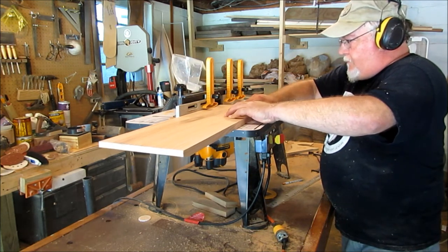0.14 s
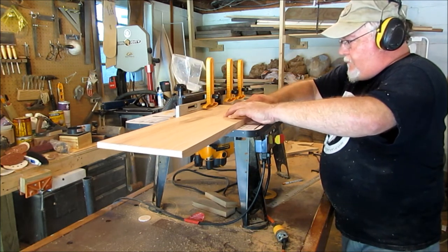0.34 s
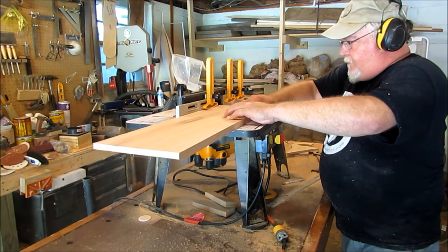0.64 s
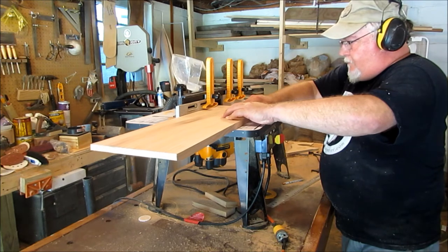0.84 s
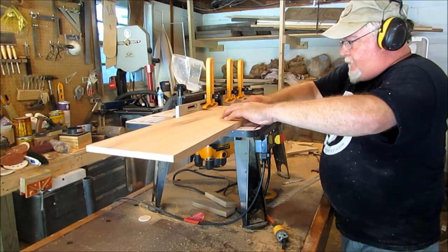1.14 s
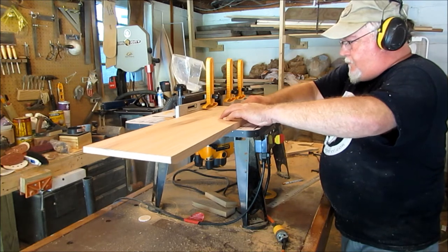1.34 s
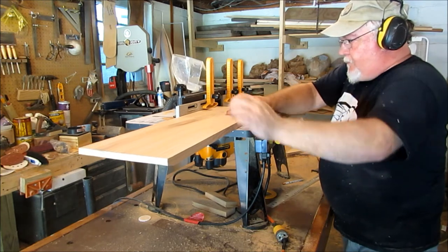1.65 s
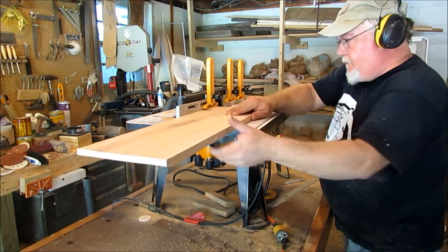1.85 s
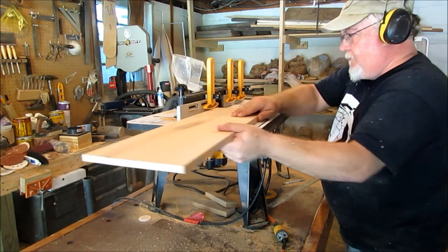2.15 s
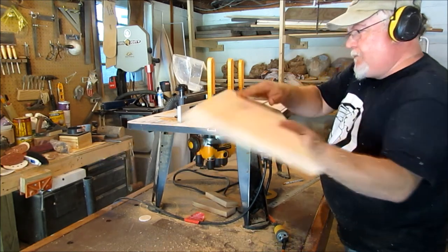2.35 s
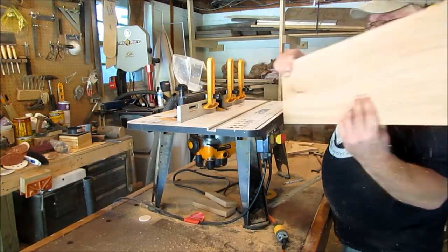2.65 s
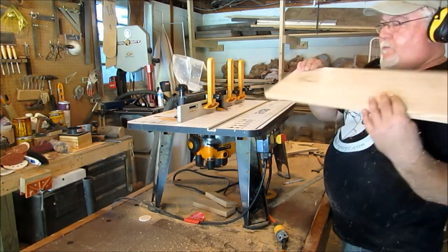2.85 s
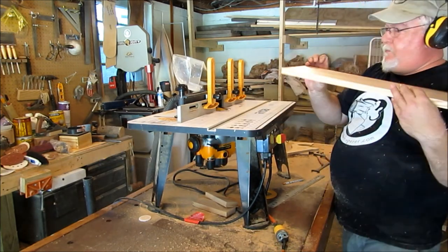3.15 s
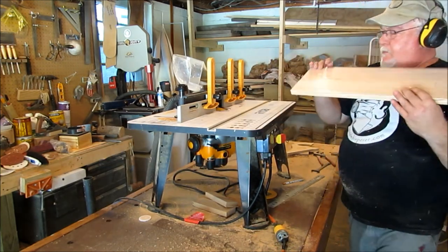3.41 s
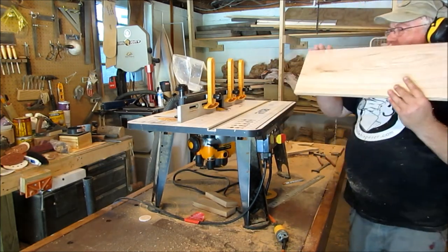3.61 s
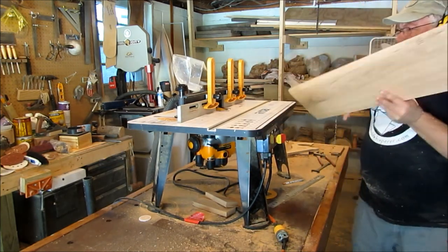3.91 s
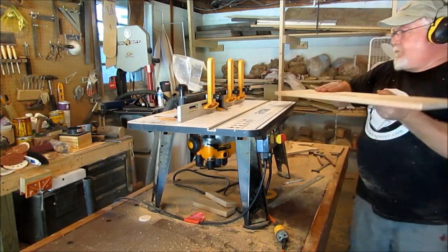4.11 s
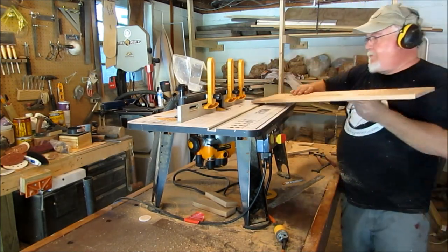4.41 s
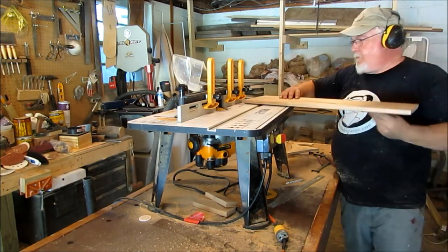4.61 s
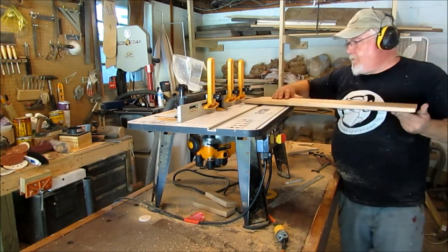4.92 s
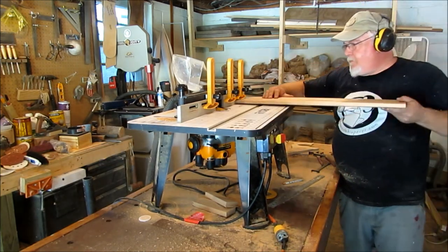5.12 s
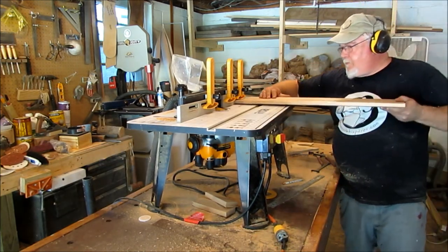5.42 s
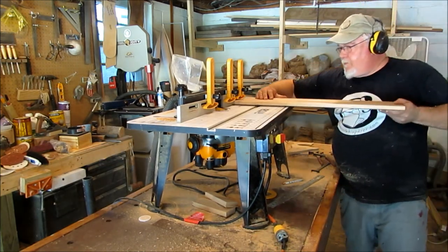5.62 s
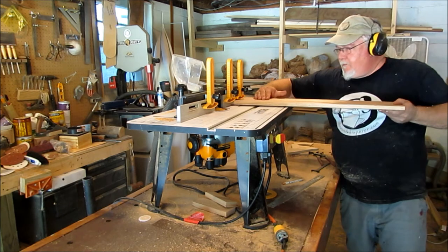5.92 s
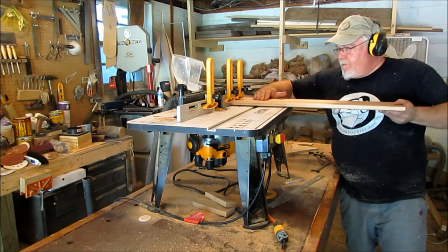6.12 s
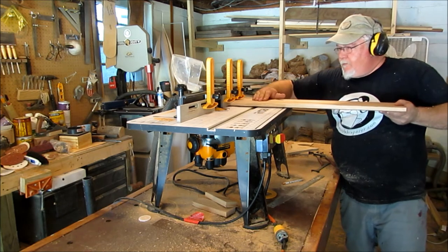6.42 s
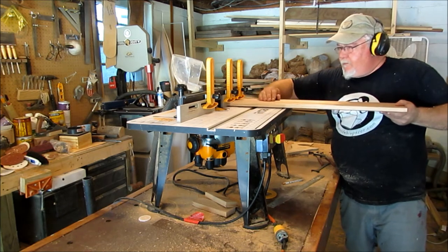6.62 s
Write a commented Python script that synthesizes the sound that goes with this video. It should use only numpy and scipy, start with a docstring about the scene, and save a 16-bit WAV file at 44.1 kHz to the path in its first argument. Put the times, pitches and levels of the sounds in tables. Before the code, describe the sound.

A table-mounted router snarls through the end of a wood cut, climbs to a steady high whine, then rattles faintly with soft wooden thuds.

```python
"""Table router in a workshop

A table router whines: its bit leaves a wooden panel and the shaft runs up to free speed, a loose part
starts to rattle once the panel is lifted, and later a panel edge touches the bit again.
Each whining tone is a sine at a multiple (order) of the shaft speed. Shaped noise makes the rush of
cooling air and a low rumble; the panel drums as a resonance and thuds as decaying sines, over mains hum."""
import sys
import numpy as np
from scipy import signal
from scipy.io import wavfile
from scipy.ndimage import uniform_filter1d

SR = 44100
rng = np.random.default_rng(int(sys.argv[2]) if len(sys.argv) > 2 else 0)


def materialize(psi):
    """Save the field psi as 16-bit PCM at rate SR to the path in sys.argv[1].

    A 1-D psi becomes a single channel; in a 2-D psi each row is a channel.
    """
    bounded = np.clip(np.atleast_2d(psi).T, -1, 1)
    quanta = np.round(bounded * 32767).astype(np.int16)
    wavfile.write(sys.argv[1], SR, quanta)


N = 298116
STEP = 256  # samples between values of the slow curves

# mean shaft speed, in turns per second: time_s, speed_hz
SHAFT_SPEED = [(0.0, 290.8), (0.21, 297.1), (0.34, 303.7), (0.68, 324.8), (0.85, 334.9), (0.98, 336.3),
               (1.45, 335.4), (3.88, 335.3), (4.25, 336.0), (4.33, 335.2), (6.72, 335.0), (6.76, 333.3)]
# onset of the loose part, added to the rattle levels: time_s, change_db
RATTLE_ONSET = [(2.17, -16), (2.23, 1.5), (5.1, -2), (6.76, 3)]


def whine(turns):
    """Harmonic synthesis: one sine per order; higher orders reach the two microphones less alike."""
    # interaural-style placing of strong orders, left-right level by panel position:
    # order, left_lead_rad, bare_db, covered_db, edge_db
    placing = [(1, -0.77, -3, 5, -9), (2, -0.25, -1, 0, 1), (3, -0.066, 0, 3, -1.5),
               (4, 0.74, -2.5, 1.5, 0), (8, .7, 7, -3.5, 5), (9, -0.62, -2.5, 3, 3), (13, 0.56, 8, 3, 8)]
    half_orders, high_orders = np.arange(1, 23) / 2, np.arange(12, 41)
    orders = np.concatenate([half_orders, high_orders])
    count = len(orders)
    t = step_times()
    amplitude = np.sqrt(2 * order_powers(t, orders))
    spread = np.clip(0.19 + 0.036 * orders, 0, 1.2)[:, None]
    lead = spread * (rng.standard_normal((count, 1)) + 1.16 * wander(0.13, count))
    pan_db = 0.8 + 3.0 * spread * wander(0.8, count)
    for order, lead_rad, *sides_db in placing:
        here = orders == order
        lead[here] = lead_rad + 0.12 * lead[here]
        pan_db[here] = by_panel(t, *sides_db) + 0.3 * pan_db[here]
    ears = np.array([gain_of(sign * pan_db) * np.exp(1j * sign * lead) for sign in (0.5, -0.5)])
    # the amplitude holds for the mean of both microphones, with a bound where they nearly cancel
    ears *= amplitude / np.maximum(abs(ears.mean(0)), 0.6)
    start_turn = rng.random(count)
    sample_times = np.arange(N) / SR
    out = np.zeros((2, N))
    for i in np.flatnonzero(amplitude.max(1) > 0):
        phasor = np.exp(2j * np.pi * (orders[i] * turns + start_turn[i]))
        out += [(np.interp(sample_times, t, ear[i]) * phasor).real for ear in ears]
    return out


def shaft_turns():
    """Phase is the integral of speed: turns made by the shaft, whose speed trembles slightly."""
    t = np.arange(N) / SR
    tremble = np.interp(t, step_times(), wander(0.03, count=1)[0])
    speed_hz = curve(SHAFT_SPEED, t)[0] * (1 + 0.0007 * tremble)
    return np.cumsum(speed_hz) / SR


def order_powers(t, orders):
    """Incoherent sources add in power: motor, rattle and cut share the orders of one shaft."""
    # the two loudest tones, order 1 from unbalance and order 2 from the bit: time_s, unbalance_db, bit_db
    loudest = [(0, -38.5, -42.5), (.15, -41.5, -38.5), (.3, -42, -42.5), (.38, -47.5, -40), (.45, -44, -41),
               (.52, -46.5, -56), (.6, -44, -46.5), (.68, -44, -57), (.75, -44, -41.5), (.82, -37, -46.5),
               (.98, -42, -43.5), (1.2, -42.5, -44.5), (2.05, -43, -40.5), (2.86, -46.5, -46),
               (3.45, -58, -46), (3.8, -52.5, -43), (4.2, -50, -46), (4.84, -49, -43), (5.06, -49, -47),
               (5.6, -50.5, -42), (5.94, -55.5, -45.5), (6.76, -57, -47)]
    blade_order, blade_depth = 9, 0.45
    count = len(orders)
    power = motor_power(t, orders) + rattle_power(t, orders)
    # echoes of the shop strengthen or cancel each tone
    drift_db = np.clip(0.7 + 0.05 * orders, 0, 1.7)[:, None] * wander(0.25, count)
    power *= gain_of(2 * drift_db)
    power += cut_power(t, orders)
    unbalance_db, bit_db = curve(loudest, t)
    power[orders == 1] = gain_of(2 * unbalance_db)
    power[orders == 2] = gain_of(2 * bit_db)
    # the fan-blade tone breaks into bursts
    real, imag = blade_depth * wander(0.012, count=2) / np.sqrt(2)
    power[orders == blade_order] *= ((1 + real) ** 2 + imag ** 2) / (1 + blade_depth ** 2)
    # turbulent air shakes the higher tones more
    flutter_depth_db = np.clip(0.25 * orders, 0, np.maximum(1.6, 0.13 * orders))[:, None]
    return power * gain_of(2 * flutter_depth_db * wander(0.015, count))


def motor_power(t, orders):
    """Periodic forces give a harmonic series: the motor's higher orders, weaker under load."""
    # base levels by panel position: order, bare_db, covered_db, edge_db
    motor_orders = [(3, -55.5, -53.5, -49), (4, -52.5, -46, -50.5), (5, -54, -49.5, -57),
                    (6, -57, -52, -49.5), (7, -56.5, -49.5, -52.5), (8, -54.5, -48, -50),
                    (9, -45.5, -47.5, -44.5), (10, -65, -54.5, -61), (11, -60, -52.5, -51.5),
                    (12, -65, -56, -55.5), (13, -48.5, -54, -53), (14, -72, -57, -64),
                    (15, -59, -58, -54.5), (16, -60, -54.5, -61), (17, -57.5, -57, -59),
                    (18, -56, -55, -56), (19, -56.5, -55, -61), (20, -58.5, -55, -58.5),
                    (21, -58, -59, -69), (22, -67, -58.5, -59), (23, -56, -57, -58), (24, -59, -55, -58),
                    (26, -60, -68, -60), (27, -63, -56, -57)]
    # brief swells and dips of single tones: time_s, order, change_db, length_s
    swells = [(.8, 5, 6.5, 0.31), (.83, 3, 4, 0.11), (1.1, 6, -9, 0.27), (1.65, 5, 4, 0.49),
              (1.753, 6, 6.5, 0.2), (1.95, 3, -7, .15), (2.25, 5, -7, 0.6), (0.753, 8, -6, 0.23),
              (1.046, 8, 3.5, 0.3), (1.07, 4, 4, 0.33), (1.72, 4, -5.5, 0.42), (1.95, 27, 6, 0.35),
              (2.0, 9, 5, .2), (2.12, 4, 3.5, 0.12), (3.0, 27, 6, .2), (3.85, 4, 4, 0.71),
              (5.238, 4, -3.5, 0.45), (5.244, 5, 10.5, 0.092), (5.39, 5, 11, 0.15), (5.4, 9, -6.5, 0.48),
              (5.4, 7, 6, .12), (5.42, 3, 10, 0.29), (5.64, 3, 4.5, 0.18), (5.63, 4, 5.5, 0.31),
              (5.65, 13, -11, 0.67), (5.907, 9, 3, 0.077), (6.7, 8, 3.5, 0.26)]
    slowed_db, full_effect_load = -6.5, 0.31  # level change, reached at this load (0-1)
    load_change_db = slowed_db * np.minimum(load(t) / full_effect_load, 1)
    power = np.zeros((len(orders), len(t)))
    for order, *levels_db in motor_orders:
        power[orders == order] += gain_of(2 * (by_panel(t, *levels_db) + load_change_db))
    for time_s, order, change_db, length_s in swells:
        power[orders == order] *= gain_of(2 * change_db * bump(t, time_s, length_s))
    return power


def rattle_power(t, orders):
    """Period doubling: a loose part that knocks on every second turn gives half orders."""
    # spectrum before the onset change is added: order, level_db
    rattle_orders = [(.5, -75), (1.5, -61.5), (2.5, -55), (3.5, -62), (4.5, -56.5), (5.5, -57), (6.5, -61),
                     (7.5, -60), (8.5, -62), (9.5, -82), (10.5, -57)]
    onset_db = curve(RATTLE_ONSET, t)[0]
    power = np.zeros((len(orders), len(t)))
    for order, level_db in rattle_orders:
        power[orders == order] += gain_of(2 * (level_db + onset_db))
    return power


def cut_power(t, orders):
    """Source and filter: blades strike wood, panel resonances colour the blows, the shop prolongs them."""
    # strength before the spectrum is shaped, and thinness 0-1 of the wood left: time_s, blow_db, thinness
    cut = [(0, -42, 0.13), (.1, -39.5, 0.24), (.3, -39.5, 0.48), (.48, -39, 0.72), (.55, -37, 0.87),
           (.61, -39.5, 0.96), (.65, -59, 1), (.8, -51.5, 0.7), (1, -70, .8)]
    # resonances of the panel, lit up as each order glides through: centre_hz, width_hz, top_db
    resonances = [(930, 34, 2), (1185, 140, 8.5), (1460, 87, 8), (1846, 70, 7.5), (2080, 23, 6),
                  (2390, 48, 7), (2483, 60, 5.5), (2655, 45, 9), (3050, 160, 8), (3276, 72, 12),
                  (3700, 170, 6), (3980, 78, 7), (4556, 230, 7.5), (5000, 200, -2), (7060, 360, 1)]
    thick_hz, thin_hz = 1550, 3550  # centre of the snarl
    fall_db, corner_fall_db = 10.5, 1  # per octave above the centre; the last thin corner is far brighter
    odd_thick_db, odd_thin_db = 1, -9  # odd orders, as the two blades differ
    top_hz = 9600  # the blows carry little above this
    shop_t60_s, shop_share = 0.38, 0.25
    hz = orders[:, None] * curve(SHAFT_SPEED, t)
    blow_db, thin = curve(cut, t)
    thin = np.clip(thin, 0, 1)
    centre_hz = thick_hz * (thin_hz / thick_hz) ** thin
    octaves = np.log2(hz / centre_hz)
    slope_db = np.where(octaves > 0, -(fall_db + (corner_fall_db - fall_db) * thin ** 5.9), 3.0)
    odd_db = odd_thick_db + (odd_thin_db - odd_thick_db) * thin ** 1.5
    db = blow_db - 3.5 + slope_db * octaves + odd_db * (orders[:, None] % 2 == 1)
    for resonance_hz, width_hz, top_db in resonances:
        db += top_db / (1 + (2 * (hz - resonance_hz) / width_hz) ** 2)
    db -= 10 * np.log10(1 + (hz / top_hz) ** 6)
    # uneven grain makes the bite ragged
    db += np.clip(0.19 * orders, 0, 2.3)[:, None] * wander(0.04, len(orders))
    blows = gain_of(2 * db) * (orders[:, None] % 1 == 0) * (t <= cut[-1][0])
    keep = 1e-6 ** (STEP / SR / shop_t60_s)
    lingering = signal.lfilter([1 - keep], [1, -keep], blows, axis=1)
    return (1 - shop_share) * blows + shop_share * lingering


def load(t):
    """Speed droop under torque: load on the motor 0-1, read from the sag of its speed."""
    free_hz, loaded_hz = 335.3, 291
    return np.clip((free_hz - curve(SHAFT_SPEED, t)[0]) / (free_hz - loaded_hz), 0, 1)


def by_panel(t, bare, covered, edge):
    """Linear superposition: blends values for a bare table, a covered table and an edge at the bit."""
    # part of the table under the panel, 0-1: time_s, share
    cover_curve = [(2.1, 1), (2.5, 0.82), (3.2, 0.35)]
    # how firmly the panel edge meets the bit, 0-1: time_s, firmness
    edge_curve = [(5.3, 0), (5.9, 0.87)]
    cover = np.clip(curve(cover_curve, t)[0], 0, 1)
    touch = np.clip(curve(edge_curve, t)[0], 0, 1)
    return bare + cover * (covered - bare) + touch * (edge - bare)


def panel():
    """Resonance of a plate: air flow drives one narrow mode, and touching down rings a decaying thud."""
    # drumming while the panel rests on the table, falling away once it is lifted: time_s, level_db
    drumming = [(.6, -79), (.8, -65), (1.4, -64.5), (2.1, -58), (2.25, -73), (6.76, -71)]
    # the panel touches down on the table top: time_s, level_db, ring_hz, t60_s
    touchdowns = [(4.365, -54, 265, .12), (4.77, -52, 325, .15), (5.755, -53, 325, .15)]
    mode_hz, width_hz = 238, 6.3
    mode = signal.iirpeak(mode_hz, mode_hz / width_hz, fs=SR)
    ring = signal.lfilter(*mode, rng.standard_normal(N))
    out = evened(ring) * gain_of(curve(drumming, np.arange(N) / SR)[0])
    t = np.arange(SR // 4) / SR
    for time_s, level_db, ring_hz, t60_s in touchdowns:
        attack = np.minimum(t / 0.0019, 1)
        thud = gain_of(level_db - 60 * t / t60_s) * np.sin(2 * np.pi * ring_hz * t) * attack
        out[round(time_s * SR):][:len(t)] += thud
    return out


def air(turns):
    """Turbulence is broadband noise: cooling air in drifting patches, pulsing with the turns, over rumble."""
    # relative spectrum of the rush: frequency_hz, density_db
    rush_spectrum = [(30, -78), (110, -30), (185, -32), (240, -15.5), (400, -16.5), (600, -12.5),
                     (860, -10), (1150, -12.5), (1450, -7.5), (3100, -5.5), (3900, -8.5), (7000, -8.5),
                     (9800, -10.5), (13000, -17), (15700, -25.5)]
    # coherence of the two microphones: frequency_hz, likeness
    likeness = [(60, 0.09), (130, 0.57), (400, .7), (1400, 0.25), (3100, 0.22), (7000, 0.74), (15000, 0.21)]
    level_db, loaded_db, dulled_db = -37, 2, -7.5  # rush; extra and treble shelf scale under load
    # the rush swells once as the panel nears the bit
    gust_s, gust_db, gust_length_s, gust_shelf_db = 5, 2.5, 0.9, -2.5
    rumble_free_db, rumble_cut_db, lumps_db = -95.5, -68, 6  # base levels, and depth of slow lumps
    size, hop = 1024, 256
    frames, hz = N // hop + 5, np.fft.rfftfreq(size, 1 / SR)
    a, b, c, d, patches = rng.standard_normal((frames, len(hz), 5)).T
    patches = evened(uniform_filter1d(uniform_filter1d(patches, 12, 0), 14, 1))
    same = np.clip(read(likeness, hz), -1, 1)[:, None]
    left = a + 1j * b
    right = same * left + np.sqrt(1 - same ** 2) * (c + 1j * d)
    noise = np.array([left, right])

    frame_t = np.arange(frames) * hop / SR
    dull_db = dulled_db * np.minimum(load(frame_t) / 0.38, 1) ** 2
    dull_db += gust_shelf_db * bump(frame_t, gust_s, gust_length_s)
    shelf_db = dull_db * read([(4000, 0.32), (9000, 0.69)], hz)[:, None]
    rush_shape = gain_of(read(rush_spectrum, hz)[:, None] + shelf_db + patches)
    rumble_shape = 1 / (1 + (hz[:, None] / 140) ** 4)
    rush, rumble = (evened(signal.istft(noise * shape, nperseg=size, noverlap=size - hop)[1][:, :N])
                    for shape in (rush_shape, rumble_shape))

    t = np.arange(N) / SR
    rattle_gain = gain_of(curve(RATTLE_ONSET, t)[0])
    pulse = 1 + 0.059 * np.cos(2 * np.pi * turns) + 0.098 * rattle_gain * np.cos(np.pi * turns)
    rush_db = level_db + loaded_db * np.minimum(load(t) / 0.41, 1)
    rush_db += gust_db * bump(t, gust_s, gust_length_s)
    lumps = np.interp(t, step_times(), wander(0.3, count=1)[0])
    rumble_db = rumble_free_db + lumps_db * lumps
    rumble_db += (rumble_cut_db - rumble_free_db) * np.minimum(load(t) / 0.37, 1)
    sides_db = [[0.4], [-0.4]]
    return rush * pulse * gain_of(rush_db + sides_db) + rumble * gain_of(rumble_db)


def hum(turns):
    """Modulation sideband: mains hum, and a tone twice the mains frequency below the shaft speed."""
    mains_hz, hum_db, sideband_db = 60, -91, -70
    mains = mains_hz * np.arange(N) / SR
    hum_tone = gain_of(hum_db) * np.sin(2 * np.pi * mains)
    sideband = gain_of(sideband_db) * np.sin(2 * np.pi * (turns - 2 * mains))
    return np.sqrt(2) * (hum_tone + sideband)  # levels are rms


def gain_of(db):
    """Logarithmic level: decibels to amplitude."""
    return 10 ** (np.asarray(db) / 20)


def evened(x):
    """Normalisation by mean power: scales to rms 1."""
    return x / np.sqrt(np.mean(x ** 2) + 1e-20)


def read(points, hz):
    """Pitch is logarithmic: interpolates a spectrum on a log-frequency axis."""
    f, value = np.transpose(points)
    return np.interp(np.log(hz + 1), np.log(f + 1), value)


def curve(rows, t):
    """Linear interpolation: all columns of a table at the times t."""
    times, *columns = np.transpose(rows)
    return np.array([np.interp(t, times, column) for column in columns])


def step_times():
    """Sampling of slow changes: the times of the control steps, in seconds."""
    return np.arange(N // STEP + 2) * STEP / SR


def wander(seconds, count):
    """Low-passed noise: slow random curves of rms 1, one value per step."""
    size = max(round(seconds * SR / STEP), 1)
    x = rng.standard_normal((count, N // STEP + 2))
    return evened(uniform_filter1d(uniform_filter1d(x, size, 1), size, 1))


def bump(t, centre_s, length_s):
    """Gaussian envelope: a bell of height 1 around one moment."""
    return np.exp(-(2 * (t - centre_s) / length_s) ** 2)


def scene():
    """Superposition: tones, air and hum of the router, and the panel."""
    turns = shaft_turns()
    return whine(turns) + air(turns) + hum(turns) + panel()


def record(dry):
    """Transducer limits: bass roll-off of the microphone, soft overload of the peaks, then a band limit."""
    ceiling, band_limit_hz = 0.093, 15740
    thin = signal.sosfilt(signal.butter(2, 50.0, "high", fs=SR, output="sos"), dry)
    soft = ceiling * np.tanh(thin / ceiling)
    low_pass = signal.firwin(1023, band_limit_hz, window=("kaiser", 10), fs=SR)
    return signal.oaconvolve(soft, low_pass[None], "same")


dry = scene()
out = record(dry)
materialize(out)
```